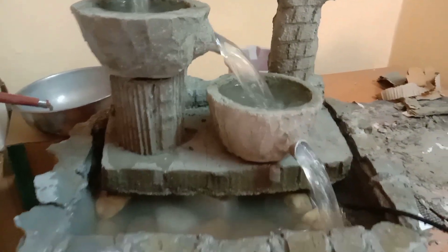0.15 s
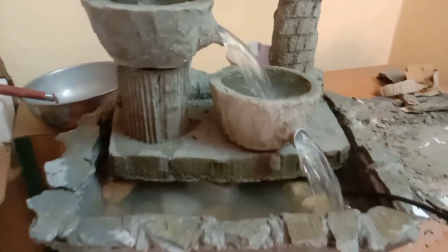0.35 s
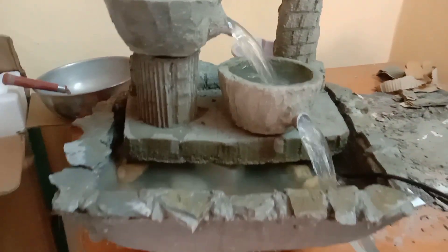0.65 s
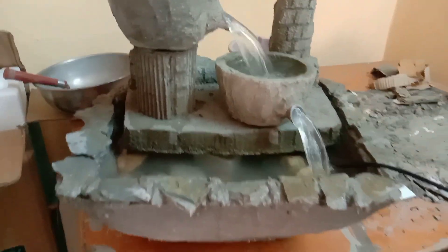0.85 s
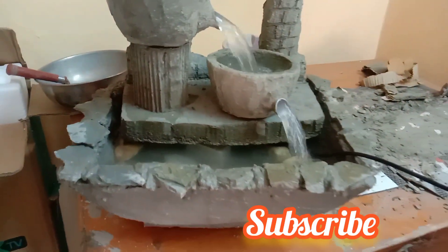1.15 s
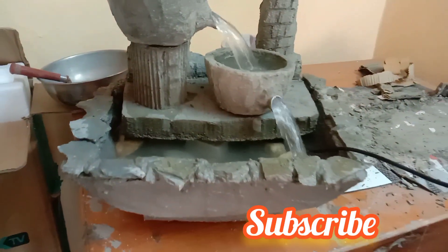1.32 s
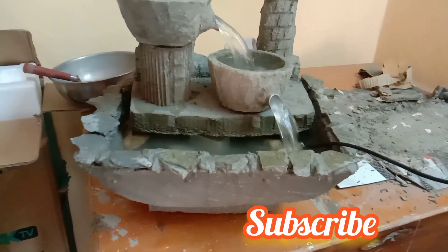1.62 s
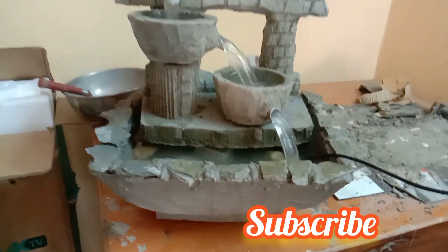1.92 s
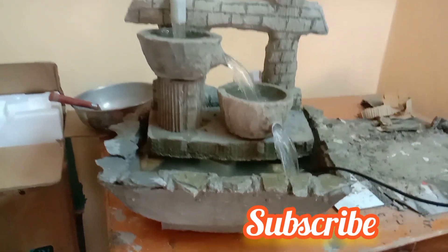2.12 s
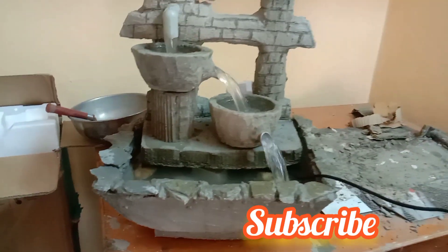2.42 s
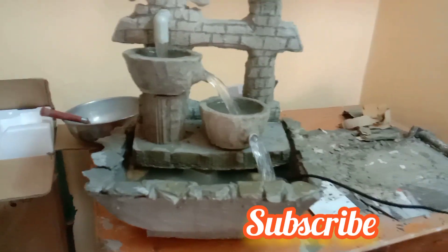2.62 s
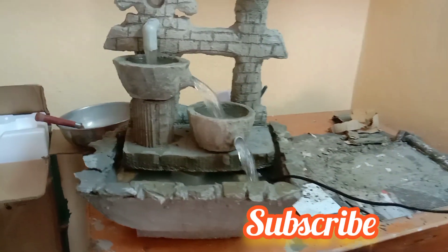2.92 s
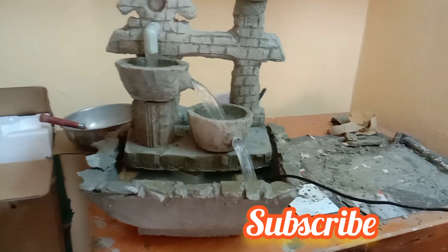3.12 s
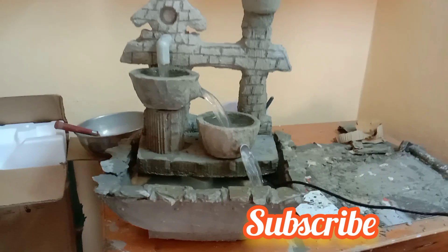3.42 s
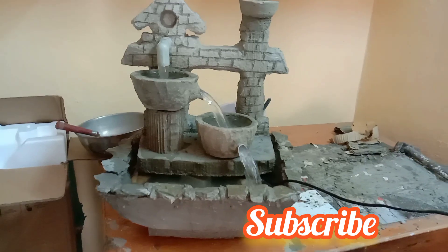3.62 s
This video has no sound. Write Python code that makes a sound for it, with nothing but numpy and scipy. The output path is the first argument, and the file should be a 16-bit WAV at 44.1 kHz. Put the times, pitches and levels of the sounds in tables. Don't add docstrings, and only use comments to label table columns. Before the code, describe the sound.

A small indoor fountain pours continuously, with hollow bubbling, bright drips and tiny spits over a low pump hum; the splash thins with distance, with short reflections from close walls, picked up on a phone.

```python
import sys
import numpy as np
from scipy import signal
from scipy.fft import rfft, irfft
from scipy.io import wavfile
from scipy.ndimage import uniform_filter1d

SR = 44100
rng = np.random.default_rng(int(sys.argv[2]) if len(sys.argv) > 2 else 0)


def master(y):
    cut = np.clip(np.atleast_2d(y).T, -1, 1)
    pcm = np.round(cut * 32767)
    wavfile.write(sys.argv[1], SR, pcm.astype(np.int16))


def decibels_to_gain(level_db):
    exponent = np.asarray(level_db, float) / 20
    return 10 ** exponent


N = 165375
HZ = np.fft.rfftfreq(8192, 1 / SR)

# start in seconds, peak level in dB, pitch in Hz.
GLUG_BUBBLES = [(0.0888, -26, 1570), (0.1174, -23, 1317), (0.1448, -19.5, 1244), (0.2482, -36, 1270),
                (0.2862, -30.5, 1257), (0.38, -23, 1290), (0.406, -28, 1357), (0.4368, -21, 1350),
                (0.5023, -24.5, 1260), (0.537, -23.5, 1275), (0.5957, -23, 1242), (0.6223, -44, 1250),
                (0.6483, -33, 1280), (0.6793, -25, 1250), (0.7568, -34, 1230), (0.7836, -33, 1270),
                (0.8599, -25, 1217), (0.9474, -26.5, 1253), (1.0928, -33.5, 1286), (1.1543, -23, 1293),
                (1.2476, -18, 1282), (1.294, -27.5, 1292), (1.3919, -31.5, 1256), (1.4234, -25.5, 1283),
                (1.4486, -24.5, 1265), (1.5458, -26, 1483), (1.5896, -20.5, 1310), (1.6701, -26.5, 1338),
                (1.744, -28.5, 1253), (1.8517, -29.5, 1330), (1.9719, -27, 1272), (2.0707, -27.5, 1325),
                (2.2255, -25, 1320), (2.2918, -45, 1260), (2.3275, -27.5, 1298), (2.4149, -27.5, 1285),
                (2.4656, -32.5, 1307), (2.5442, -28, 1304), (2.6727, -31, 1280), (2.7472, -34, 1256),
                (2.806, -28.5, 1315), (2.9246, -26, 1285), (3.024, -37, 1296), (3.2373, -26.5, 1253),
                (3.3445, -27.5, 1306), (3.4067, -47, 1370)]
GURGLE_BUBBLES = [(0.294, -38, 730), (0.388, -33, 814), (0.435, -36, 735), (0.513, -34, 672),
                  (0.952, -34, 812), (1.248, -33, 765), (1.308, -29.5, 778), (1.458, -35, 694),
                  (1.842, -42, 584), (2.092, -36.5, 826), (2.699, -44.5, 545), (2.814, -37, 625),
                  (3.09, -34.5, 697)]
PLINK_DROPS = [(0.0862, -41, 2210), (0.1386, -30.5, 2980), (0.2004, -28, 3390), (0.2659, -21, 3920),
               (0.2888, -27.5, 3000), (0.311, -41, 2840), (0.3506, -31, 2990), (0.381, -27.5, 3070),
               (0.41, -28.5, 2870), (0.465, -25.5, 3980), (0.5102, -27, 2930), (0.593, -32.5, 2670),
               (0.6812, -40.5, 3000), (0.758, -42, 2680), (0.8649, -32, 2960), (0.9403, -31, 3280),
               (0.9685, -30.5, 2970), (1.0774, -34.5, 2670), (1.1246, -36.5, 3740), (1.1593, -38, 2280),
               (1.2467, -35.5, 2910), (1.2974, -33.5, 3350), (1.3855, -38.5, 2800), (1.423, -39, 2900),
               (1.474, -45, 2510), (1.507, -34, 2535), (1.746, -45, 2910), (1.8018, -28.5, 2840),
               (1.8756, -39, 2890), (2.0866, -33, 3690), (2.1747, -35, 2460), (2.2552, -27.5, 3110),
               (2.7143, -47, 2540), (2.7326, -23.5, 4240), (2.99, -34.5, 3410), (3.021, -30, 2300),
               (3.4643, -26.5, 3990)]
TINK_DROPS = [(0.164, -32, 5200), (0.1835, -47, 5650), (0.2, -19, 5630), (0.3671, -39, 5200),
              (0.393, -28, 5420), (0.451, -29, 5280), (0.4748, -21, 5430), (0.5575, -24.5, 5500),
              (0.6515, -32, 5060), (0.7078, -22, 5280), (0.8359, -27, 5210), (0.8652, -27.5, 5360),
              (0.9026, -42, 5000), (0.9197, -29, 6670), (1.0785, -28.5, 5620), (1.1917, -38.5, 4640),
              (1.3113, -30.5, 5550), (1.6064, -33, 5560), (1.6687, -37, 5440), (1.8756, -37, 7500),
              (1.938, -34, 7130), (2.0706, -31, 5240), (2.304, -55, 5450), (2.3228, -31, 5130),
              (2.4134, -35, 5320), (2.5237, -35, 5300), (2.604, -37.5, 5740), (2.6733, -31, 5280),
              (2.7356, -23, 4700), (2.7826, -22, 5880), (2.8594, -39.5, 5330), (3.0577, -39, 6810),
              (3.173, -21, 5780), (3.2115, -26.5, 5480), (3.277, -35, 5800), (3.6093, -30, 5180)]
SPIT_DROPLETS = [(0.1136, -46, 9190), (0.144, -35, 10000), (0.2214, -38, 8750), (0.3686, -50, 10300),
                 (0.432, -48, 9900), (0.4798, -33, 10370), (0.5112, -52, 15100), (0.5566, -33, 15500),
                 (0.595, -38.5, 9050), (0.6985, -30, 15200), (0.8694, -40.5, 9000), (0.9193, -39, 8800),
                 (0.966, -44, 10600), (1.0136, -40, 9100), (1.4064, -39, 8500), (1.551, -45, 8800),
                 (1.825, -46.5, 9000), (1.8796, -33.5, 8640), (1.9378, -36, 8770), (2.187, -46, 9550),
                 (2.2536, -40.5, 8700), (2.3326, -40, 11950), (2.4229, -43, 14800), (2.4468, -42.5, 8550),
                 (2.5531, -45, 9400), (2.7816, -49, 8900), (2.9407, -43, 13000), (3.1475, -35, 14900),
                 (3.1951, -49.5, 9100), (3.2106, -35.5, 10680), (3.2779, -37, 9390), (3.6067, -39, 11100),
                 (3.6606, -44, 8840)]
MIXED_BUBBLES = [(0.2013, -24, 6630), (1.964, -37.5, 3700), (2.7357, -18.5, 7000), (3.172, -28, 5000),
                 (3.278, -34, 7600), (3.332, -29.5, 5850), (3.36, -26, 7000), (3.41, -36.5, 7250),
                 (1.269, -49, 338), (3.134, -35, 7000), (3.526, -33, 1080), (3.63, -38.5, 1186)]

# frequency in Hz, level in dB per Hz.
SWARM_COLOUR = [(100, -49.5), (400, -10), (900, -7.5), (1400, -1.5), (2000, -8.5), (5500, -10), (9000, -26),
                (16000, -33.5)]
# frequency in Hz, width in Hz, lift in dB.
BOWL_RESONANCES = [(596, 68, 9.5), (703.5, 27.5, 6), (778, 60, 11), (1030, 123, 6.5), (1268, 80, 14),
                   (1517, 94, 6), (1680, 83, 4.5), (2595, 290, 4), (2910, 130, -1), (3390, 580, -2.5),
                   (4100, 300, 3.5)]
# frequency in Hz, width in Hz, lift in dB.
PORT_RESONANCES = [(4430, 520, -7.5), (5280, 160, 4), (6186, 143, -7), (7000, 320, 8.5), (8100, 370, -10.5),
                   (7760, 200, -0.5), (13000, 2770, -4), (15100, 1300, 6)]


def evened(x):
    return x / np.sqrt(np.mean(x ** 2) + 1e-20)


def read(points, hz):
    f, value = np.transpose(points)
    return np.interp(np.log(hz + 1), np.log(f + 1), value)


def bumps(table, hz):
    return sum(db / (1 + (2 * (hz - f) / width) ** 2) for f, width, db in table)


def colour(x, db):
    both_sides = np.r_[db, db[-2:0:-1]]
    log_gain = np.log(decibels_to_gain(np.maximum(both_sides, -100)))
    taps = np.fft.ifft(np.exp(np.conj(signal.hilbert(log_gain)))).real[:4096]
    return signal.oaconvolve(x, taps)[:N]


def wander(top_hz):
    t = np.arange(0, N + 64, 64) / SR
    swell = sum(np.sin(2 * np.pi * (f * t + rng.random())) for f in np.geomspace(5, top_hz, 30))
    return np.interp(np.arange(N) / SR, t, evened(swell))


def bubble(hz, cycles, rise, soft):
    u = np.arange(int(8 * cycles / hz * SR) + 8) * hz / SR / cycles
    swell = 1 - np.exp(-(u / soft) ** 2)
    wave = swell * np.exp(-u) * np.sin(2 * np.pi * cycles * (u + rise * u ** 2 / 2))
    return wave / abs(wave).max()


def pump():
    # frequency in Hz, level in dB per Hz.
    rumble_colour = [(15, -69), (25, -30), (86, -9), (156, -2), (240, -7.5), (272, 2), (308, -8.5),
                     (414, 1.5), (480, -14), (620, -28), (1060, -120)]
    # frequency in Hz, width in Hz, level in dB.
    hum_lines = [(155, 17.6, -64.5), (201.3, 35, -66), (283.3, 26, -69), (342, 25, -68)]
    hz = np.fft.rfftfreq(N, 1 / SR)
    rumble_noise, hum_noise = rfft(rng.standard_normal((2, N)), axis=1)
    rumble = decibels_to_gain(-62.5) * evened(irfft(rumble_noise * decibels_to_gain(read(rumble_colour, hz)), N))
    hum = np.zeros(N)
    for f, width, db in hum_lines:
        line = irfft(hum_noise / (1 + (2 * (hz - f) / width) ** 2), N)
        hum += decibels_to_gain(db) * evened(line)
    throb = decibels_to_gain(2.66 * wander(top_hz=20))
    return (rumble + hum) * throb


def stirring(hz):
    stir_db, spread_octaves, every_size_share = 49, 0.76, 0.65
    rise_s, fade_s, linger = 0.0072, 0.01, 0.4
    s, db, pitch = np.transpose([*GLUG_BUBBLES, *GURGLE_BUBBLES, *PLINK_DROPS,
                                 *TINK_DROPS, *SPIT_DROPLETS, *MIXED_BUBBLES])
    like_size = np.exp(-(np.log2(pitch / hz) / spread_octaves) ** 2)
    like_size *= decibels_to_gain(read(SWARM_COLOUR, 1400) - read(SWARM_COLOUR, pitch))
    kicks = np.zeros(N)
    np.add.at(kicks, (s * SR).astype(int), (like_size + every_size_share) * decibels_to_gain(db + stir_db) / 30)
    fade = np.exp(-1 / (fade_s * max(hz / 1400, 1) ** linger * SR))
    power = signal.lfilter([1], [1, -fade], kicks ** 2)
    return 1 + np.sqrt(abs(uniform_filter1d(power, round(rise_s * SR))) + 1e-12)


def swarm():
    # time in seconds, level in dB,
    # splashiness of the small bubbles in dB.
    pouring = [
        (0, -37.5, -13),
        (.35, -41, -2),
        (.75, -42, -6),
        (1.0, -41, -6),
        (1.55, -39.5, -6),
        (1.82, -45, -7),
        (2.6, -44, -3.5),
        (3.3, -46, -1.5),
        (3.75, -46.5, 1.5),
    ]
    bubbles_per_s, spread_db, small_bias = 5500, 2.5, .62
    surge_db, shared_surge_db, spray_db, splash_share = 3.17, 2.5, -6, 0.75
    t = np.arange(N) / SR
    pitches = np.geomspace(350, 16000, 40)
    kind = (len(pitches) * rng.random(N) ** small_bias).astype(int)
    born = rng.random(N) < bubbles_per_s / SR
    size = born * decibels_to_gain(spread_db * np.minimum(rng.exponential(1, N), 3.5))

    shared_surge = decibels_to_gain(shared_surge_db * wander(top_hz=21.67))
    s, level_db, splash_db = np.transpose(pouring)
    splash = decibels_to_gain(splash_share * np.interp(t, s, splash_db - splash_db.mean()))
    surges = [decibels_to_gain(surge_db * wander(top_hz=18)) * splash ** min(hz / 3000, 1) for hz in pitches[2::5]]

    bubbles = np.zeros(N)
    for k, hz in enumerate(pitches):
        grain = bubble(hz, cycles=2.62 + min(hz, 6000) / 900, rise=0.0087, soft=1.0)
        rarity = np.sqrt(hz / 3000 / np.mean(kind == k) / len(pitches))
        grain = grain / np.linalg.norm(grain) * rarity
        hits = size * (kind == k) * surges[k // 5] * stirring(hz)
        bubbles += signal.oaconvolve(hits, grain)[:N]
    bubbles /= np.sqrt(np.median(uniform_filter1d(bubbles ** 2, 2000)))
    spray = decibels_to_gain(spray_db) * np.sqrt(stirring(4200) * splash) * rng.standard_normal(N)
    ringing = colour(shared_surge * (bubbles + spray),
                     read(SWARM_COLOUR, HZ) + bumps(BOWL_RESONANCES, HZ))
    return decibels_to_gain(np.interp(t, s, level_db)) * evened(ringing)


def drops(table, cycles, soft, early_s, scatter, spread_s, db, mates_db, tick_db):
    out = np.zeros(N + SR)
    spits = rng.standard_normal((len(table), 88))
    mates = rng.uniform(-1, 1, (len(table), 4, 3))
    for (s, peak_db, hz), spit, group in zip(table, spits, mates):
        level = decibels_to_gain(peak_db + db - bumps(PORT_RESONANCES, hz))
        at = round(s * SR)
        out[at:at + 88] += level * decibels_to_gain(tick_db) * np.diff(spit, prepend=0) * np.hanning(88)
        voices = [(hz, 0, 1)]
        for pitch, late, size in group:
            delay_s = spread_s * (late + 1) ** 2 / 4
            voices.append((hz * (1 + scatter * pitch), delay_s, decibels_to_gain(mates_db + 4.0 * size)))
        for voice_hz, delay_s, gain in voices:
            wave = bubble(min(voice_hz, 16000), cycles, 0.013, soft)
            at = round((s - early_s + delay_s) * SR)
            out[at:at + len(wave)] += level * gain * wave
    return out[:N]


def glugs():
    big = drops([*GLUG_BUBBLES, *GURGLE_BUBBLES], cycles=3.5, soft=3.36, early_s=0.007, scatter=0.15,
                spread_s=.02, db=-11.0, mates_db=-8, tick_db=-19)
    return colour(big, 0.54 * bumps(BOWL_RESONANCES, HZ))


def plinks_and_spits():
    plinks = drops([*PLINK_DROPS, *TINK_DROPS, *MIXED_BUBBLES], cycles=8.26, soft=0.6, early_s=.0006,
                   scatter=.11, spread_s=0.03, db=-7, mates_db=-8, tick_db=-27)
    spits = drops(SPIT_DROPLETS, cycles=12.5, soft=0.28, early_s=0.00017, scatter=0.13,
                  spread_s=0.009, db=-2.5, mates_db=-6.5, tick_db=-12)
    return plinks + spits


def room(x):
    # frequency in Hz, time to fall 60 dB in seconds.
    room_decay = [(200, 0.096), (1000, 0.33), (3000, 0.12), (7000, 0.15), (15000, 0.32)]
    first_wall_s, dull_db = .005, -6
    out, turn = np.zeros(N), np.arange(N) / SR * 3.1
    for k in range(3):
        taps = np.zeros(SR // 2)
        at = np.arange(round(first_wall_s * SR), SR // 2 - 40, 20)
        jitter, sign = rng.standard_normal((2, SR // 40))[:, :len(at)]
        taps[at + (abs(jitter) * 1e4 % 20).astype(int)] = np.sign(sign)
        hz, t, z = signal.stft(taps, SR, nperseg=128)
        fall = decibels_to_gain(-60 * t / read(room_decay, hz)[:, None])
        tail = signal.istft(z * fall, SR, nperseg=128)[1]
        part = x * np.cos(np.pi * (turn + k / 3)) * np.sqrt(2 / 3)
        running = np.r_[part[len(taps):0:-1], part]
        out += signal.fftconvolve(running, tail / np.linalg.norm(tail))[len(taps):][:N]
    return colour(out, dull_db * np.log2(np.maximum(HZ / 3000, 1)))


def scene():
    water = swarm() + glugs()
    single = plinks_and_spits()
    echoes = room(water + decibels_to_gain(8) * single)
    return (pump() + water + single + decibels_to_gain(-2.5) * echoes)[None]


def top_cut(x):
    return signal.sosfilt(signal.butter(12, 16830, fs=SR, output="sos"), x)


def record(dry):
    hiss = decibels_to_gain(-79) * np.diff(rng.standard_normal(N + 1))
    heard = colour(dry[0], bumps(PORT_RESONANCES, HZ)) + hiss
    edge_db = -45 * np.clip((HZ - 15750) / 300, 0, 1)
    return top_cut(colour(heard, edge_db)[None])


dry = scene()
out = record(dry)
master(out)
```